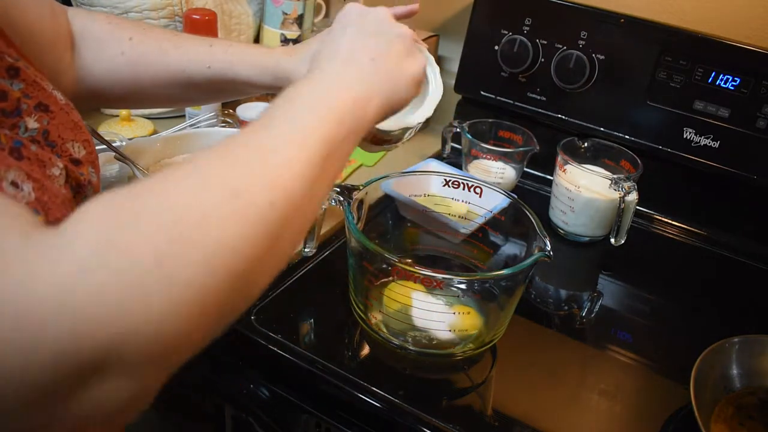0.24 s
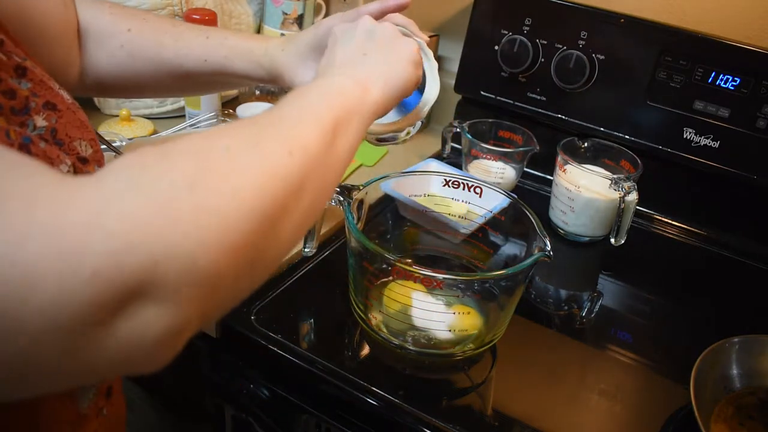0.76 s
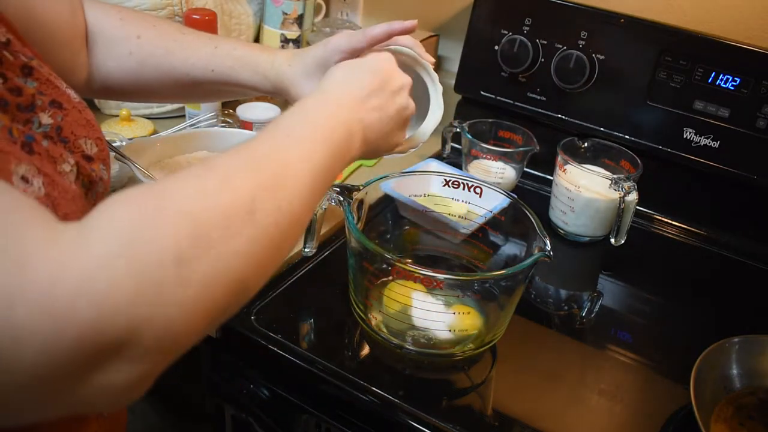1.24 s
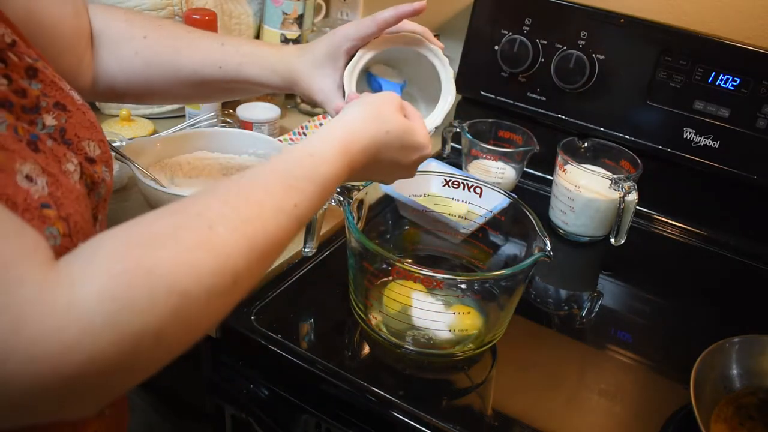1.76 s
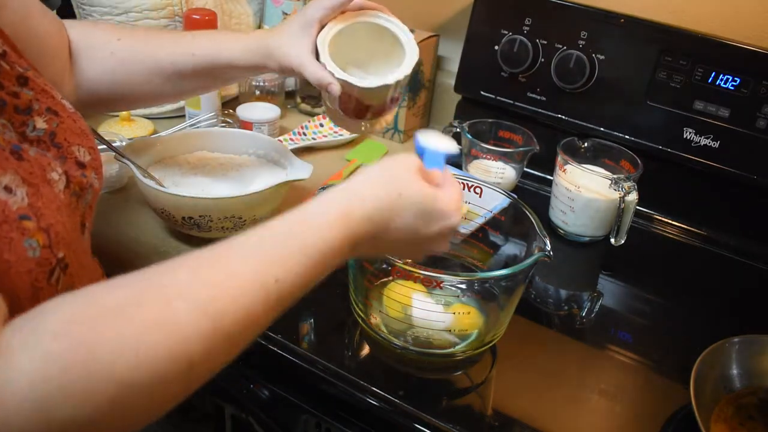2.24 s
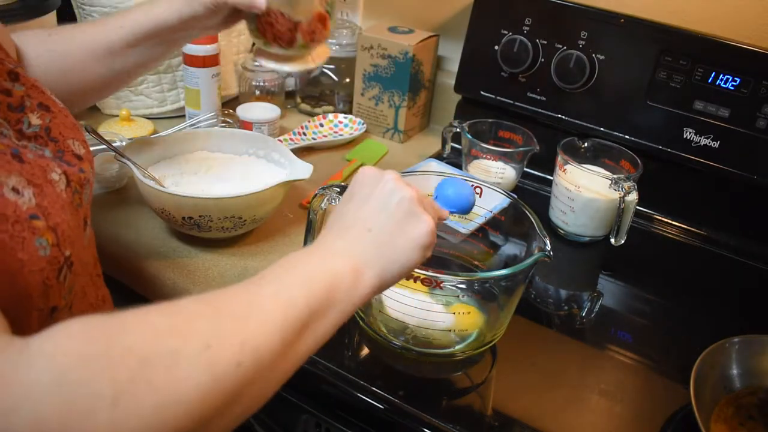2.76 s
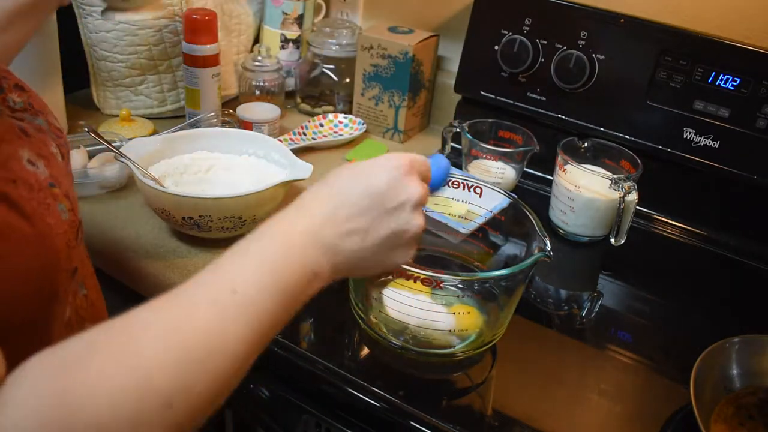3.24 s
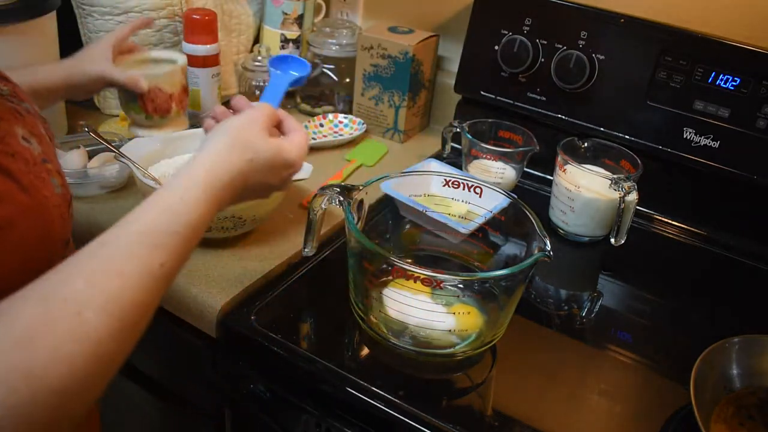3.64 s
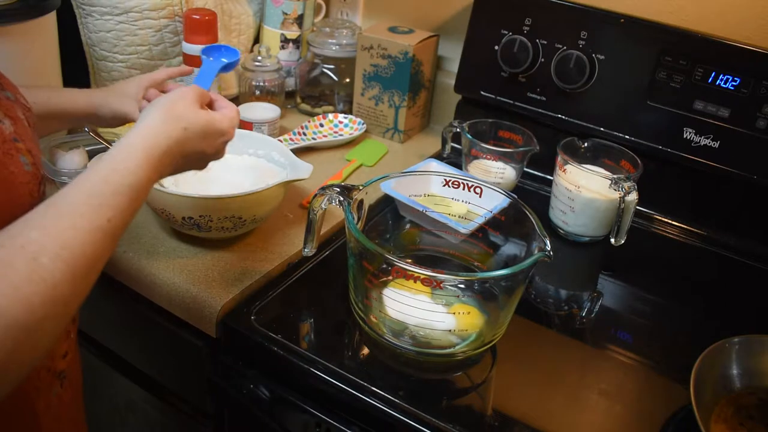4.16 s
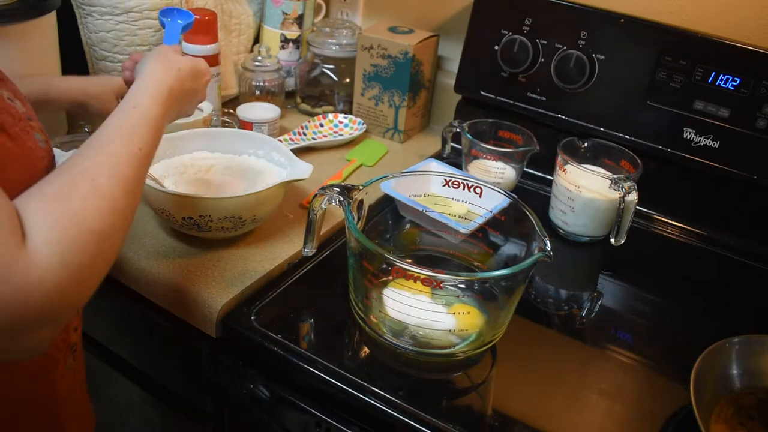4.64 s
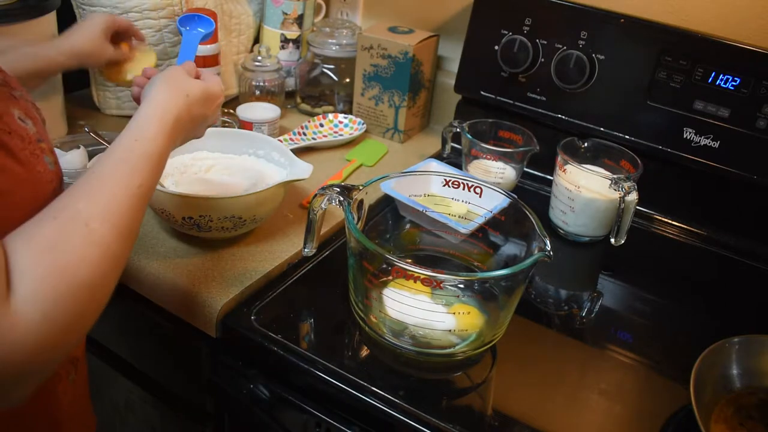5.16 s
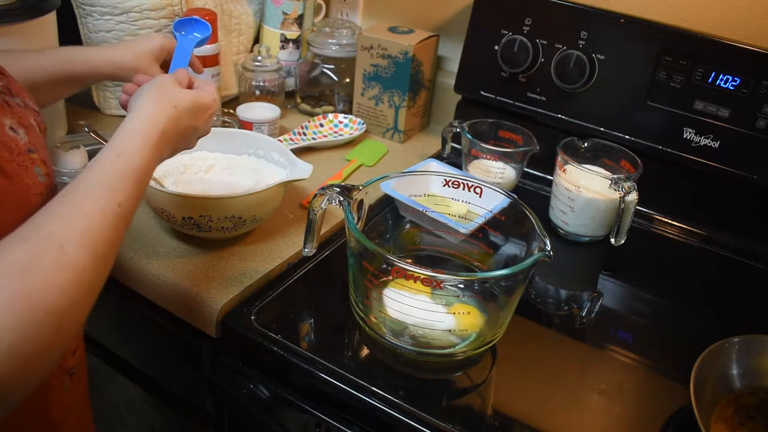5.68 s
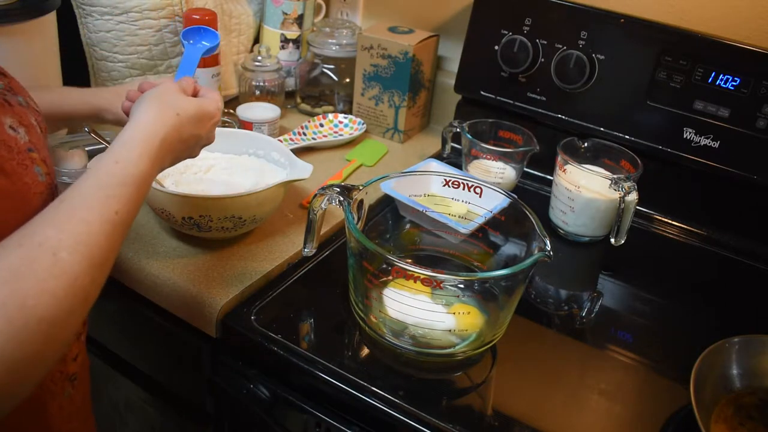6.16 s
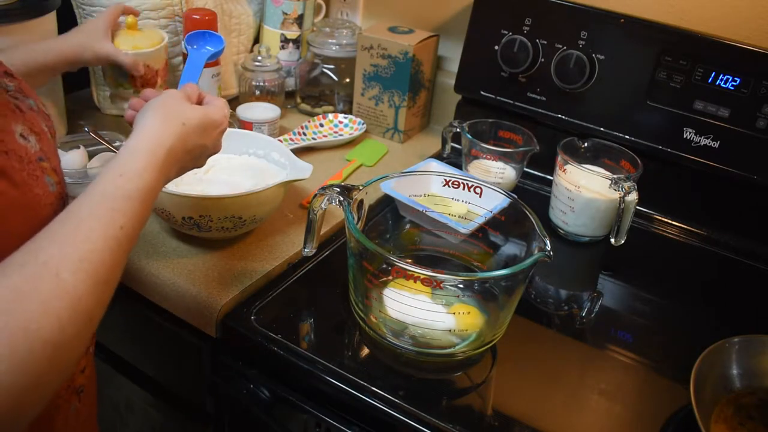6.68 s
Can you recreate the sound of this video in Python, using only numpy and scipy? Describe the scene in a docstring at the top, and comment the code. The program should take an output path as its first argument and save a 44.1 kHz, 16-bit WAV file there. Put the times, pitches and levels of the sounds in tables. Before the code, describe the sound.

In a small kitchen, a low fan hums steadily with a faint thin whistle. Close by, a spoon ticks a ceramic bowl, brushes sugar softly, then digs in with quick gritty crunches and bright ticks. After a quiet gap the bowl lands on the counter with a dull, woody knock. Later its lid is lifted with a small bump and clinks into place, slightly farther off.

```python
"""A spoon ticks on a ceramic bowl, brushes the sugar in it, then digs through it with a crunch.
At about 4 s the bowl is put down with a knock; near 6 s its lid is picked up and clinks into place.
Bursts of tiny impacts, passed through the resonances of bowl, counter or lid, make these sounds.
A fan made of filtered noise and wavering sines hums throughout, with a thin whistle on two pitches.
A small kitchen adds quick echoes and a short tail to the handling sounds."""
import sys
import numpy as np
from scipy import signal
from scipy.fft import rfft, irfft
from scipy.io import wavfile
from scipy.ndimage import uniform_filter1d

SR = 44100
rng = np.random.default_rng(int(sys.argv[2]) if len(sys.argv) > 2 else 0)


def generate_wav(sig):
    """Save sig (samples, or channels by samples) to the path in sys.argv[1] as 16-bit PCM at SR."""
    pcm = np.round(np.clip(np.atleast_2d(sig).T, -1, 1) * 32767).astype(np.int16)
    wavfile.write(sys.argv[1], SR, pcm)


N = 305172  # length in samples

# Event levels come before the gains set in the functions; "length" is the time a burst takes to die away.
# the spoon's pushes through the sugar: start t/s, length t/s, crunch level/dB, hollow part over crunch level/dB
PUSHES = [(0.924, 0.059, -35.5, -4), (1.03, 0.0643, -21, -9), (1.126, 0.0445, -20, -4.5),
          (1.207, 0.0587, -23, -2.5), (1.303, 0.0311, -22.5, -15), (1.341, 0.029, -31.5, 4),
          (1.423, 0.0647, -33, -5), (1.517, 0.0281, -26, -8), (1.566, 0.1133, -43.5, -15.5)]
PUSH_ATTACK_S, PUSH_RELEASE_S = 0.0159, 0.0098
# light brushing before the spoon bites: start t/s, length t/s, level/dB
BRUSHES = [(0.399, 0.032, -46.5), (0.526, 0.0192, -43), (0.614, 0.07, -46), (0.767, 0.0928, -42.5)]
BRUSH_ATTACK_S, BRUSH_RELEASE_S = 0.0041, 0.0149
# packed sugar giving way in its largest slips: t/s, level/dB, centre f/Hz
SLIPS = [(1.031, -11, 2300), (1.053, -10, 6380), (1.125, -4.5, 5200), (1.144, -8.5, 2040),
         (1.161, -7.5, 6000), (1.209, -6, 2780), (1.230, -8.5, 4910), (1.239, -6, 5180), (1.2815, -4, 5220),
         (1.2925, -4.5, 3050), (1.312, -2, 3140), (1.320, -4.5, 6040), (1.340, -4, 5130),
         (1.3815, -10, 4900)]
SLIP_S = 0.00356
# smaller slips at random: level over the push, scatter either way, range of pitch
CRUMBLE_DB, CRUMBLE_SCATTER_DB, CRUMBLE_HZ = 11, 2, (2000, 6600)
# the spoon ticking on the bowl's wall: t/s, level/dB, centre f/Hz, length t/s
TICKS = [(.3637, -22, 3390, 0.00073), (.9175, -16, 6140, 0.00092), (.996, -5.5, 6640, 0.0079),
         (1.4456, -14.5, 3900, 0.0036), (1.471, -14, 4870, 0.00457), (1.5197, -14.5, 4100, 0.00106),
         (1.531, -14, 5600, 0.0048), (1.574, -16, 5800, 0.0038), (1.5853, -7, 4500, 0.00164),
         (1.6578, -18, 5870, 0.00078), (1.7387, -17.5, 4340, 0.0021), (1.801, -20, 4320, 0.00072)]
# knocks of spoon and lid that sound the bowl's hollow: t/s, level/dB, favoured f/Hz, length t/s
HOLLOW_KNOCKS = [(.365, -31.5, 730, 0.00274), (6.428, -32, 2180, 0.0031), (6.441, -24.5, 1134, 0.0016),
                 (6.462, -36, 1800, 0.0063), (6.589, -36, 1345, 0.0062), (6.775, -45, 1720, 0.0063)]
# spoon, fingers and lid touching the glazed rim: t/s, level/dB, favoured f/Hz, length t/s
RIM_TOUCHES = [(.3638, -28, 3900, 0.0004), (3.911, -40.5, 5020, 0.0113), (4.011, -36, 3875, 0.01),
               (4.188, -39.5, 2390, 0.0045), (4.261, -45, 6460, 0.0021), (4.289, -48.5, 8200, 0.0038),
               (5.843, -36, 2180, 0.0164), (6.416, -33.5, 10500, 0.0023), (6.423, -27.5, 6070, 0.0048),
               (6.596, -40, 5080, 0.01), (6.842, -52, 4000, 0.0041)]
# blows on the counter from bowl and lid: t/s, level/dB, favoured f/Hz, length t/s
COUNTER_KNOCKS = [(4.184, -22.5, 1388, 0.0034), (4.188, -13.5, 700, 0.0029), (4.197, -17.5, 597, 0.00124),
                  (4.203, -20.5, 800, 0.00167), (4.239, -30, 499, 0.0019), (5.842, -28, 1180, .008),
                  (5.862, -26, 716, 0.00233), (6.268, -37.5, 1100, 0.0045)]
# the lid rocking on the counter as it is picked up: t/s, level/dB, favoured f/Hz, length t/s
LID_ROCKS = [(5.758, -37.5, 6500, 0.00133), (5.760, -28.5, 478, 0.0022), (5.773, -24.5, 486, 0.0021)]
# the lid tapped while it hangs free: t/s, level/dB, favoured f/Hz, length t/s
LID_TAPS = [(6.223, -27, 5400, 0.0022)]
# weight landing on the counter makes its slab boom: t/s, level/dB
BOOMS = [(4.185, -28.5), (5.846, -41.5), (6.272, -44)]
BOOM_HZ, BOOM_RISE_S, BOOM_T60_S = 115.7, 0.0048, 0.312

# the bowl's broad colour: f/Hz, relative level/dB
BOWL_SPECTRUM = [(50, -46), (200, -32), (450, -17.5), (750, -3.5), (1100, -6.5), (1550, -3.5), (2000, -1),
                 (2400, -0.5), (3000, 2), (4100, -5), (6600, -2.5), (7500, -11.5), (10000, -14),
                 (13000, -18), (16000, -31)]
# the bowl's resonances: f/Hz, width f/Hz, strength relative to the spectrum level/dB
BOWL_MODES = [(819.1, 17.4, 16.7), (992, 37.4, 9.15), (1333, 68, 3.66), (1858, 23.4, 1.3), (2041, 167, 7.7),
              (2738, 50, 2.63), (3296, 38, 2), (5080, 250, 5.76), (6362, 140, 3.86), (9816, 257, 3.2)]
# the bowl's hollow, broad colour: f/Hz, relative level/dB
HOLLOW_SPECTRUM = [(150, -36.5), (500, -5.5), (800, 10), (1700, -2), (2300, -15), (5000, -11.5),
                   (12000, -55.5)]
# the hollow's resonances: f/Hz, width f/Hz, strength relative to the spectrum level/dB
HOLLOW_MODES = [(707.3, 13.6, 9.2), (823.3, 29, 11.2), (950, 15.7, 8.8), (1061, 1.74, 17.4),
                (1739, 19, 8.8), (2800, 35, 8.5)]
# the glazed rim's broad colour: f/Hz, relative level/dB
RIM_SPECTRUM = [(400, -7.5), (1800, 8), (3500, -0.5), (5000, -3.5), (6500, 0), (7400, -15), (11000, -21),
                (16000, -21)]
# the rim's resonances: f/Hz, width f/Hz, strength relative to the spectrum level/dB
RIM_MODES = [(2799, 27.3, 9.17), (4353, 27, 7.3), (4843, 28, 4.6), (5400, 74, 7), (5630, 23, 6.5),
             (5960, 83, 8.8), (8430, 80, 7.5), (10330, 59, 17.8), (11000, 35, 15), (11280, 60, 7),
             (13870, 150, 8)]
# the counter's broad colour: f/Hz, relative level/dB
COUNTER_SPECTRUM = [(40, -37.5), (90, -17), (180, -10), (380, 8.5), (620, 3.5), (1000, 0.5), (1700, -5.5),
                    (2800, -22), (6000, -34.5), (14000, -75)]
# the counter's resonances: f/Hz, width f/Hz, strength relative to the spectrum level/dB
COUNTER_MODES = [(127.2, 25, 25.4), (366, 64.4, 11.9), (591, 41.3, 10.15), (635.6, 17, 2.4),
                 (917, 15.4, 0.96), (1346, 9.2, 2.6)]
# the lid on the counter, broad colour: f/Hz, relative level/dB
RESTING_LID_SPECTRUM = [(150, 0), (480, 8), (800, 1), (2200, -11.5), (3500, -19), (5800, -19.5),
                        (7200, -37), (16000, -44.5)]
# the resting lid's resonances: f/Hz, width f/Hz, strength relative to the spectrum level/dB
RESTING_LID_MODES = [(498.5, 56, 11.6), (2160, 37, 10.6), (2460, 34, 8.8), (5520, 30, 18.1),
                     (5650, 41, 18.6), (8916, 21, 36.4), (10050, 26, 23)]
# the free lid's broad colour: f/Hz, relative level/dB
LID_SPECTRUM = [(300, -11), (1600, -5.5), (2400, 0.5), (3300, -6.5), (5500, -1), (7200, -21.5),
                (12000, -22), (16000, -34.5)]
# the free lid's resonances: f/Hz, width f/Hz, strength relative to the spectrum level/dB
LID_MODES = [(2380, 146, 18.1), (2466, 32, 16.3), (2830, 32, 9.3), (3920, 19.4, 17), (4796, 58, 14),
             (4810, 50, 7.1), (5360, 41, 8.3), (5783, 40.6, 20.1), (5720, 17, 15.3), (7880, 26, 14.8),
             (10020, 36, 27.7), (11970, 40, 12)]

# colour of the fan's rushing air: f/Hz, relative level/dB
AIR = [(25, -25), (55, -20), (80, -17), (110, -14), (180, -8), (260, 1.5), (340, -4.5), (650, -9),
       (1300, -17.5), (2000, -26), (4800, -31), (6300, -32), (7500, -42.5), (10500, -45), (15500, -54)]
AIR_DB = -45  # rms level of the air
# hum of the motor: f/Hz, rms before wavering level/dB
HUM = [(59.2, -76.5), (81, -70), (143, -67), (214.5, -60.5), (265, -56), (296.2, -59), (355.35, -41),
       (414.55, -52.5), (651.4, -64.5), (710.6, -61), (880, -64), (1184.3, -65.5)]
# faint high lines of the motor: f/Hz, rms before wavering level/dB
WHINE = [(2900, -77.5), (3198, -78), (3435, -77.5), (3494, -74), (3731, -77), (3849, -86), (3908, -80),
         (5862, -73.5), (6928, -85)]
# the thin whistle's two pitches: f/Hz, rms before wavering level/dB
WHISTLE = [(5626, -70), (5803, -67.5)]
# how long the kitchen rings: f/Hz, time to fall by 60 dB t/s
KITCHEN_RING = [(120, 0.91), (500, 0.289), (1200, 0.351), (3500, 0.366), (6000, 0.299), (10000, 0.219),
                (16000, 0.209)]
EDGE_HZ = 16000  # upper edge of the final sound


def pushing():
    """Adds up the spoon's pushes into two gains: the crunch and the hollow low part."""
    dig, deep = np.zeros(N), np.zeros(N)
    for start, length, db, low_db in PUSHES:
        push = amp(db) * stroke(start, length, PUSH_ATTACK_S, PUSH_RELEASE_S)
        dig += push
        deep += push * amp(low_db)
    return dig, deep


def scoop(dig, deep, crunch_db=-7, hollow_db=-4, brush_db=-5, fizz_db=-13, hollow_hz=1250, fine_db=4):
    """Crystals grind under the spoon and shake the bowl; deep strokes also sound its hollow."""
    brush = np.zeros(N)
    for start, length, db in BRUSHES:
        brush += amp(db + brush_db) * stroke(start, length, BRUSH_ATTACK_S, BRUSH_RELEASE_S)

    # the hollow part keeps only the low sound
    low_pass = lambda hz: -10 * np.log10(1 + (hz / hollow_hz) ** 8)
    hollow = ring(BOWL_SPECTRUM, BOWL_MODES, low_pass)
    low_grind = crystals(rate=2500, spread_db=1.5) * deep * amp(hollow_db)
    out = signal.oaconvolve(low_grind, hollow)[:N]

    # crystals of different sizes crack at different pitches
    crunch = (dig * amp(crunch_db) + brush) / 2
    for centre_hz in [1900, 2970, 3900, 6300]:
        body = ring(BOWL_SPECTRUM, BOWL_MODES, lambda hz: 9 * favour(hz, centre_hz, 0.61))
        out += signal.oaconvolve(crystals(rate=1000, spread_db=5.0) * crunch, body)[:N]

    # the finest ones snap sparsely and high
    fizz = (dig + brush * amp(fine_db)) * amp(fizz_db) / 2
    for centre_hz in [7390, 8750, 10840, 12500]:
        body = ring(BOWL_SPECTRUM, BOWL_MODES, lambda hz: 22 * favour(hz, centre_hz, 0.555))
        out += signal.oaconvolve(crystals(rate=150, spread_db=7.5) * fizz, body)[:N]
    return out


def crystals(rate, spread_db):
    """Cracking crystals as random clicks (rate per second), rms 1: most are small, a few large."""
    size = amp(spread_db * np.minimum(rng.exponential(1, N), 4))
    sign = rng.choice([-1, 1], N)
    cracks = rng.random(N) < rate / SR
    return unit(size * sign * cracks)


def stroke(start, length, attack, release):
    """Gain of one movement of the spoon: it bites, holds and dies away."""
    t = np.arange(N) / SR - start
    bite = np.clip(t / attack, 0, 1)
    return bite * np.exp(-np.clip((t - length) / release, 0, 60))


def crumbles(dig, count=44):
    """Small slips spread through the digging, about as strong as the push of the moment allows."""
    when, size, pitch = rng.random((count, 3)).T
    start = PUSHES[0][0]
    end = PUSHES[-1][0] + PUSHES[-1][1]
    s = start + (end - start) * (np.arange(count) + when) / count
    push_db = 20 * np.log10(dig[(s * SR).astype(int)] + 1e-9)
    db = push_db + CRUMBLE_DB + CRUMBLE_SCATTER_DB * (2 * size - 1)
    low_hz, high_hz = CRUMBLE_HZ
    return list(zip(s, db, low_hz * (high_hz / low_hz) ** pitch))


def spoon(rows, gain_db, focus_db, treble_db, octaves, first):
    """Bursts at the spoon's edge ring the bowl; crushed crystals add treble."""
    out = np.zeros(N)
    for s, db, centre_hz, length in rows:
        tint = lambda hz: (focus_db * favour(hz, centre_hz, octaves)
                           + treble_db * favour(hz, 8100, 1.0))
        body = ring(BOWL_SPECTRUM, BOWL_MODES, tint)
        burst = signal.fftconvolve(chatter(length, first), body)
        add(out, s, amp(db + gain_db) * burst / np.linalg.norm(burst))
    return out


def blows(rows, spectrum, modes, gain_db, focus_db, first):
    """Contacts ring one body (hollow, rim, counter or lid), each favouring its own pitch."""
    out = np.zeros(N)
    for s, db, centre_hz, length in rows:
        body = ring(spectrum, modes, lambda hz: focus_db * favour(hz, centre_hz, 0.529))
        blow = signal.fftconvolve(chatter(length, first), body)
        add(out, s, amp(db + gain_db) * blow / np.linalg.norm(blow))
    return out


def chatter(length, first):
    """One contact, of energy 1: a first impact, then tiny impacts that die away."""
    t = np.arange(int(5 * length * SR) + 2) / SR
    grains = rng.standard_normal(len(t)) * np.exp(-t / length)
    grains /= np.linalg.norm(grains)
    grains[0] += first
    return grains / np.linalg.norm(grains)


def ring(spectrum, modes, tint=lambda hz: 0, size=16384):
    """A struck body's response, of energy 1: broad colour plus resonances; tint adds a colour in dB."""
    hz = np.fft.rfftfreq(size, 1 / SR)
    peaks = sum(amp(db) ** 2 / (1 + (2 * (hz - f) / width) ** 2) for f, width, db in modes)
    log_gain = np.log(amp(read(spectrum, hz) + tint(hz)) * np.sqrt(1 + peaks))
    # minimum phase: nothing sounds before the blow
    circle = np.concatenate([log_gain, log_gain[-2:0:-1]])
    response = irfft(np.exp(np.conj(signal.hilbert(circle)))[:len(hz)])
    return response / np.linalg.norm(response)


def favour(hz, centre_hz, octaves):
    """A smooth hump from 0 to 1: the part of a body's sound that one contact excites best."""
    return np.exp(-(np.log2((hz + 1) / centre_hz) / octaves) ** 2)


def booms():
    """The counter's lowest mode swings under each heavy landing and dies away."""
    out = np.zeros(N)
    t = np.arange(SR) / SR
    rise = np.minimum(t / BOOM_RISE_S, 1)
    decay = np.exp(-np.log(1000) * t / BOOM_T60_S)
    swing = np.sin(2 * np.pi * BOOM_HZ * t) * rise * decay
    for s, db in BOOMS:
        add(out, s, amp(db) * swing)
    return out


def fan():
    """Rushing air is coloured noise; the motor's hum, high lines and whistle are wavering sines."""
    colour = amp(read(AIR, np.fft.rfftfreq(N, 1 / SR)))
    air = unit(irfft(rfft(rng.standard_normal(N)) * colour, N))
    hum = tones(HUM, waver_db=0.85, waver_rate=3.7, wander=0.126)
    whine = tones(WHINE, waver_db=3.0, waver_rate=3.6, wander=0.19)
    whistle = tones(WHISTLE, waver_db=2.5, waver_rate=3.0, wander=0.28)
    return amp(AIR_DB) * air + hum + whine + whistle


def tones(lines, waver_db, waver_rate, wander):
    """Sines that waver at random in level (dB) and phase (radians)."""
    t = np.arange(N) / SR
    out = np.zeros(N)
    for hz, db in lines:
        level = np.sqrt(2) * amp(db + waver_db * drift(waver_rate))
        phase = 2 * np.pi * (hz * t + rng.random()) + wander * drift(waver_rate)
        out += level * np.sin(phase)
    return out


def drift(rate):
    """Slow random motion of rms 1: noise with little left above the rate in Hz."""
    hz = np.fft.rfftfreq(N, 1 / SR)
    keep_slow = np.exp(-(hz / rate) ** 2) * (hz > 0)
    return unit(irfft(rfft(rng.standard_normal(N)) * keep_slow, N))


def kitchen(x, wet_db, early_db, size=37):
    """Direct sound, quick echoes off the counter and stove, and a tail of dying noise."""
    t = np.arange(SR // 2) / SR
    hz, at, z = signal.stft(rng.standard_normal(len(t)), SR, nperseg=256)
    fade = amp(-60 * at / read(KITCHEN_RING, hz)[:, None])  # each pitch has its own fading time
    tail = signal.istft(z * fade, SR, nperseg=256)[1][:len(t)]
    tail *= np.clip((t - .003) / 0.0127, 0, 1)
    response = amp(wet_db) * tail / np.linalg.norm(tail)
    echoes = (rng.uniform(.001, .008, size=6) * SR).astype(int)
    response[echoes] += amp(early_db) * rng.choice([-1, 1], size=6)
    response[0] += 1  # direct sound
    # the room adds time but favours no band: its broad bumps are evened out
    bumps_db = 10 * np.log10(uniform_filter1d(abs(rfft(response)) ** 2, 2 * size))
    inverse = np.column_stack([np.fft.rfftfreq(len(t), 1 / SR), -bumps_db])
    even = signal.fftconvolve(response, ring(inverse, []))
    even *= np.linalg.norm(response) / np.linalg.norm(even)
    return signal.oaconvolve(x, even)[:N]


def amp(db):
    """Turns decibels into a gain."""
    return 10 ** (np.asarray(db) / 20)


def unit(x):
    """Scales a sound to rms 1."""
    return x / np.sqrt(np.mean(x ** 2) + 1e-20)


def read(points, hz):
    """Reads between a table's points on a log-frequency axis."""
    f, value = np.transpose(points)
    return np.interp(np.log(hz + 1), np.log(f + 1), value)


def add(mix, s, sound):
    """Mixes a sound in at a given time in seconds."""
    part = mix[round(s * SR):][:len(sound)]
    part += sound[:len(part)]


def scene():
    """The scooping is close; the bowl is put down and lidded farther along the counter."""
    dig, deep = pushing()
    slip_rows = [(*row, SLIP_S) for row in SLIPS + crumbles(dig)]
    slips = spoon(slip_rows, gain_db=11.0, focus_db=8, treble_db=2.5, octaves=0.18, first=0.21)
    ticks = spoon(TICKS, gain_db=12, focus_db=9.5, treble_db=2.5, octaves=0.623, first=0.067)
    hollow = blows(HOLLOW_KNOCKS, HOLLOW_SPECTRUM, HOLLOW_MODES, gain_db=19.5, focus_db=9.5, first=1.91)
    rim = blows(RIM_TOUCHES, RIM_SPECTRUM, RIM_MODES, gain_db=17.0, focus_db=8.5, first=0.15)
    knocks = blows(COUNTER_KNOCKS, COUNTER_SPECTRUM, COUNTER_MODES,
                   gain_db=20.5, focus_db=11.5, first=0.685)
    rocks = blows(LID_ROCKS, RESTING_LID_SPECTRUM, RESTING_LID_MODES,
                  gain_db=21.5, focus_db=8, first=0.7)
    lid = blows(LID_TAPS, LID_SPECTRUM, LID_MODES, gain_db=19.5, focus_db=1, first=1.23)

    near = kitchen(scoop(dig, deep) + slips + ticks, wet_db=-6.0, early_db=-11.5)
    far = kitchen(lid + rim + hollow, wet_db=-1.5, early_db=-6.5)
    counter = kitchen(knocks + rocks, wet_db=-4.0, early_db=-6.5) + booms()
    return (near + far + counter + fan())[None]


def record(dry):
    """Removes the sound above the upper edge with a steep low-pass filter."""
    low_pass = signal.firwin(511, EDGE_HZ, window=("kaiser", 9), fs=SR)
    return signal.oaconvolve(dry, low_pass[None], "same")


dry = scene()
out = record(dry)
generate_wav(out)
```